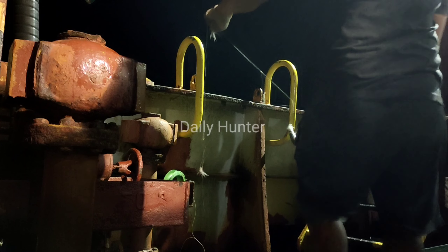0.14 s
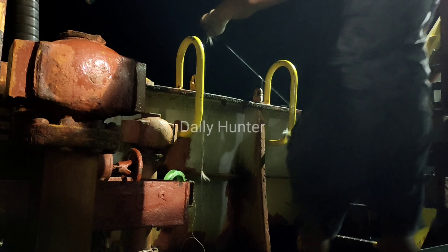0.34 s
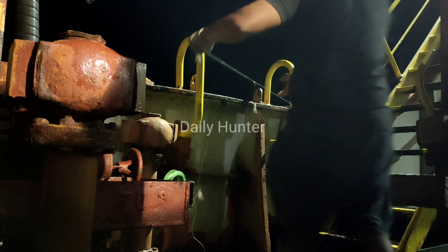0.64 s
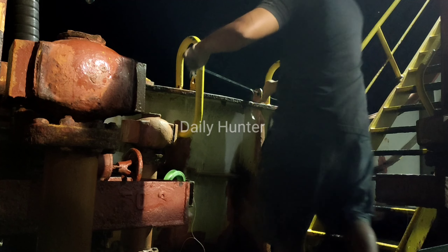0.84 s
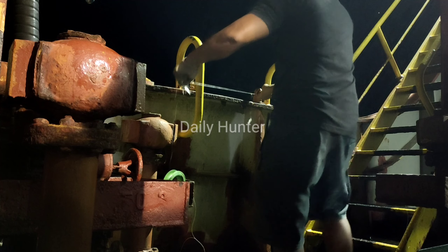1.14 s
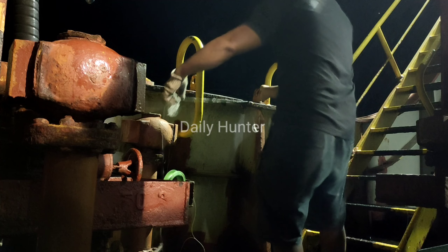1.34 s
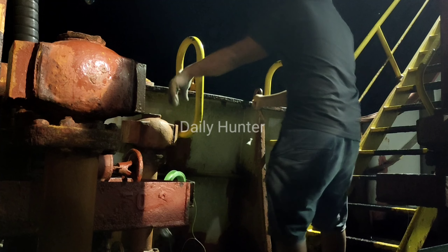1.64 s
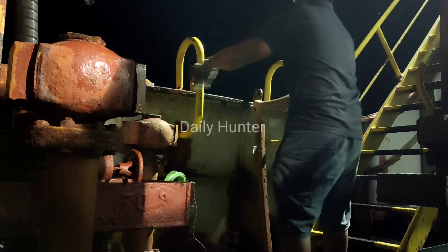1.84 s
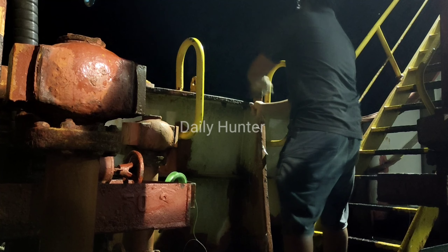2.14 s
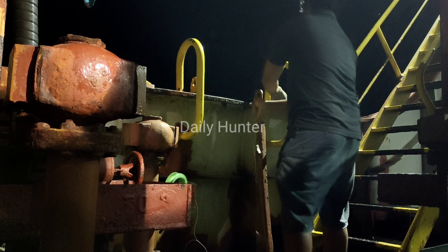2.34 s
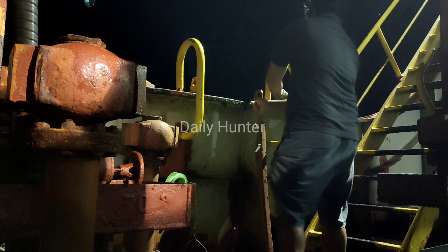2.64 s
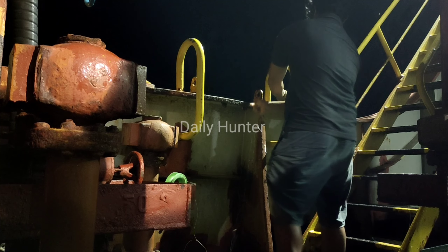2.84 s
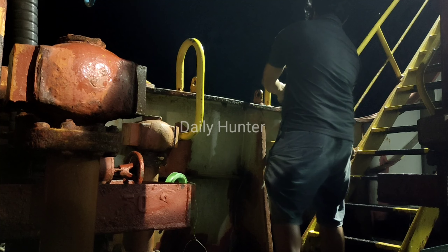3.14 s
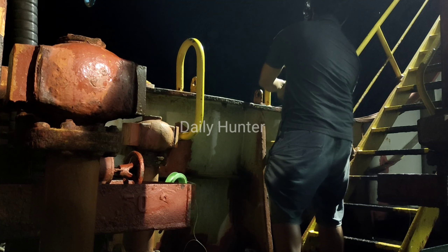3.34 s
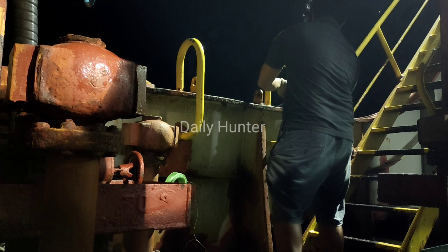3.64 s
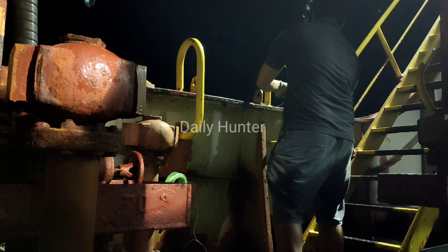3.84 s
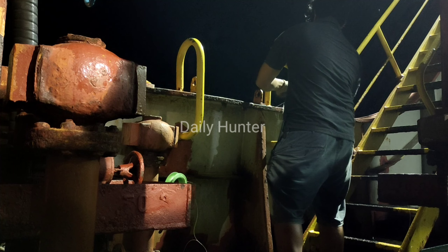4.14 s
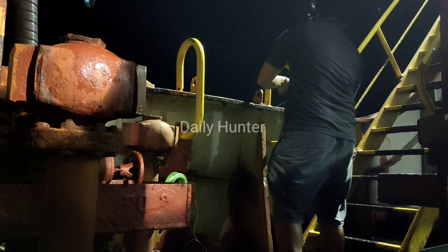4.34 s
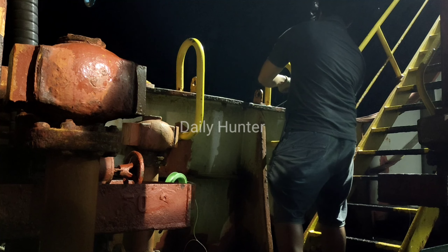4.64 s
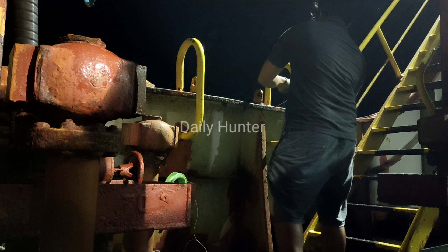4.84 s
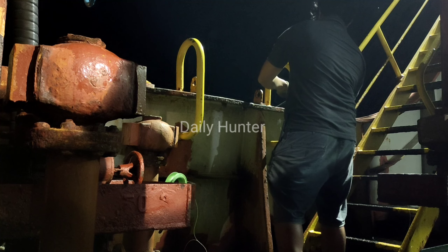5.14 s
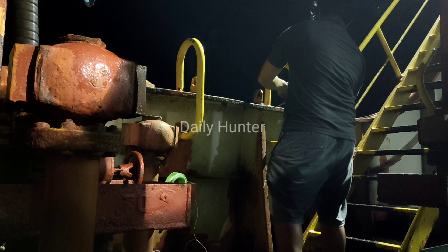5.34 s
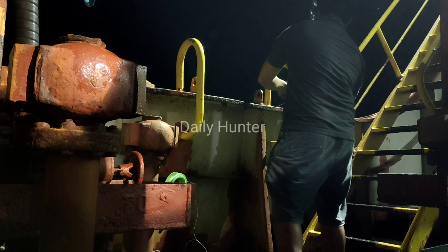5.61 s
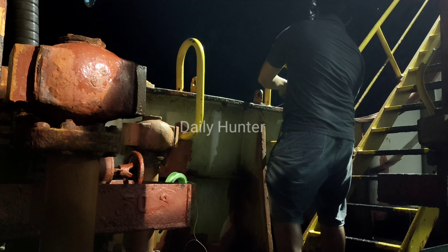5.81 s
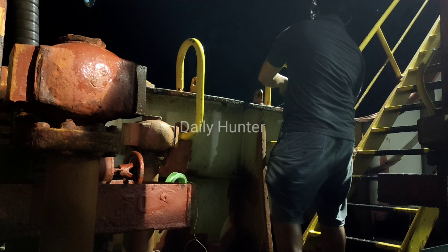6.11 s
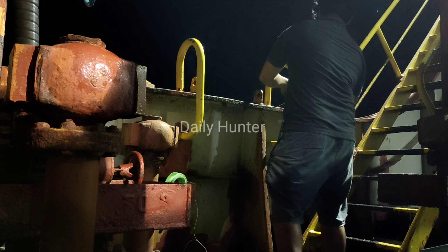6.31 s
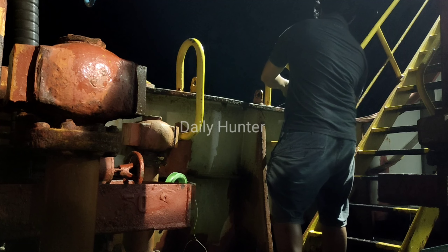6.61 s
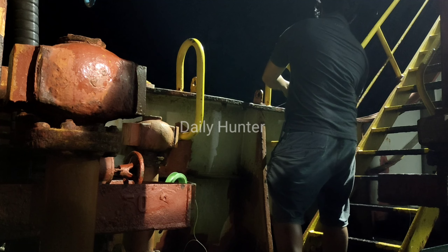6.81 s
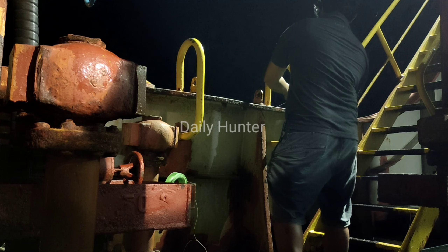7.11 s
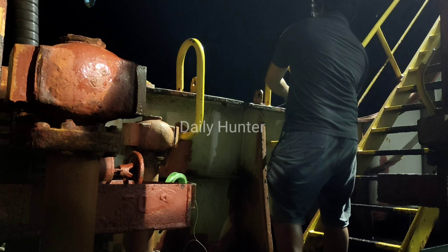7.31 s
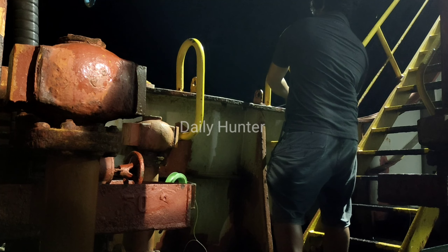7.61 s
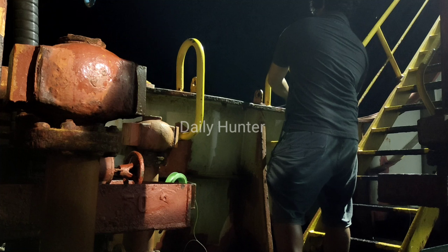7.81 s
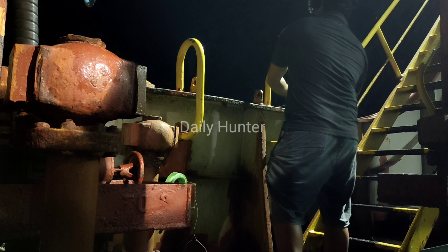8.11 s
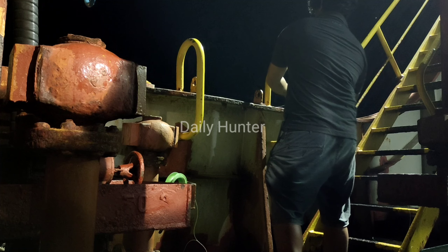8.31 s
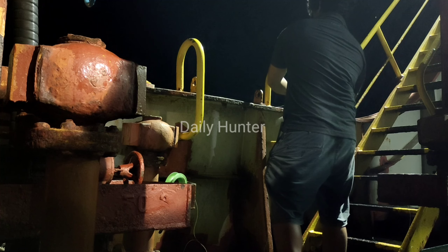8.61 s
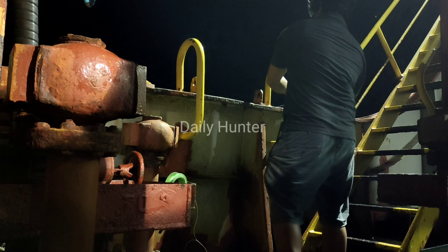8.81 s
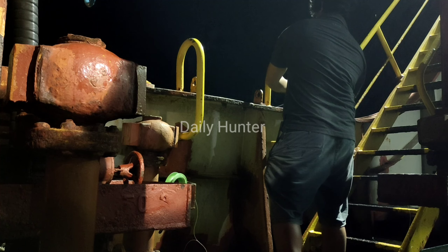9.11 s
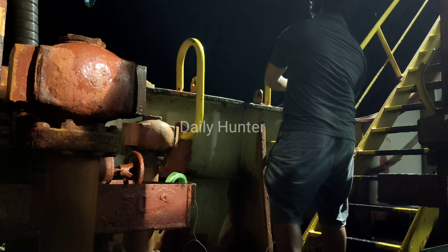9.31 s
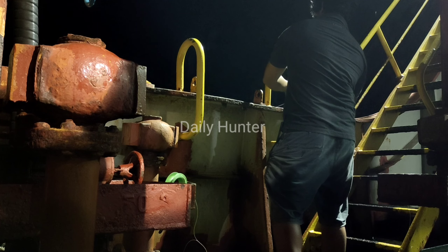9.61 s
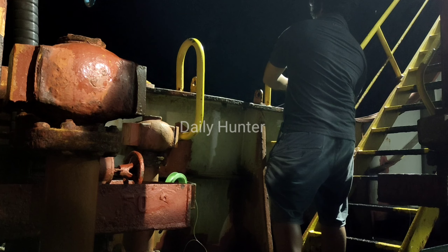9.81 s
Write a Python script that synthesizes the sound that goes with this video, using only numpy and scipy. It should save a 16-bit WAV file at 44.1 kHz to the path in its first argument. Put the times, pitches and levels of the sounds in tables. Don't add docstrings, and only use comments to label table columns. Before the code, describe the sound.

From 0 to 10 seconds a loud, low diesel drone runs without a break on a ship's steel deck. The strongest tone sits near 113 hertz, with neighbouring tones around 83 to 100 hertz making a rapid, rough throb; engine speeds stay steady, though the weaker set sags slightly around 4 seconds and strengthens afterwards. Above it, a vent duct hum near 187 hertz wavers, swelling and cutting off several times per second at irregular intervals, strongest in the first 2.5 seconds and again near 5.3 and 6.2. A muffled broad roar rings through plates with short metallic reflections. Very faint thin squeaks, around 1.6 kilohertz, come at about 6.1, 6.9, 7.2 and 7.9 seconds, nearly buried. Quiet microphone hiss stays on top, and the overall level rises only about a decibel and a half. It ends still droning.

```python
import sys
import numpy as np
from scipy import signal
from scipy.fft import rfft, irfft, next_fast_len
from scipy.io import wavfile

SR = 44100
rng = np.random.default_rng(int(sys.argv[2]) if len(sys.argv) > 2 else 0)


def pcm_store(signal):
    levels = np.round(np.clip(np.atleast_2d(signal), -1, 1) * 32767)
    wavfile.write(sys.argv[1], SR, levels.astype(np.int16).T)


def voltage_ratio(decibels):
    exponent = np.asarray(decibels, float) / 20
    return 10 ** exponent


N = 439236

BIG_SET_ORDERS = [(4, -53.5), (5, -52.0), (6, -38.5), (7, -21), (8, -25), (9, -12.5), (10, -58.5),
                  (11, -48.5), (18, -56.0), (20, -66), (21, -69), (23, -57), (24, -52.5), (25, -56.5),
                  (26, -58.5), (27, -61.5), (30, -62), (31, -67.5), (36, -64), (43, -69.5)]
SMALL_SET_ORDERS = [(5, -60), (6, -46.5), (7, -50), (8, -43.5), (9, -25.5), (10, -43.5), (13, -40.5),
                    (14, -40.5), (15, -48), (16, -53), (17, -56.5), (18, -54.5), (21, -53.5), (27, -57),
                    (29, -65), (32, -57.5), (33, -63), (35, -58.5), (36, -62.5)]
# time_s, firing_hz, crank_lead_rad (of firing), load_db
BIG_SET_RUN = [(0, 112.874, 1.4, 0), (10, 112.874, 1.4, 0)]
# time_s, firing_hz, crank_lead_rad (of firing), load_db
SMALL_SET_RUN = [(0, 82.86, -1.2, -.5), (1.75, 82.86, -1.5, -1.2), (3.2, 82.86, -1.6, .8),
                 (4.2, 82.86, -2.3, -2.5), (4.9, 82.86, -2.75, -1.5), (5.8, 82.86, -2.6, 1.2),
                 (8.6, 82.86, -2.9, 1), (10, 82.86, -2.95, 2.8)]
# peak_s, level_db_rms, build_up_s
DUCT_SWELLS = [(.33, -32.5, .28), (.55, -31.5, .14), (.8, -32, .16), (1.14, -37, .15), (1.36, -38.5, .12),
               (1.61, -33.5, .2), (1.97, -33.5, .6), (2.3, -31.5, .15), (2.44, -32.5, .2), (2.76, -40, .08),
               (3.33, -34, .4), (3.8, -35.5, .4), (4.33, -36.5, .3), (4.55, -35.5, .14), (4.88, -37.5, .3),
               (5.33, -31.5, .12), (5.77, -34, .2), (6.18, -31.5, .07), (6.57, -37, .15), (6.74, -32.5, .08),
               (7.57, -33.5, .9), (7.88, -35.5, .2), (8.07, -32, .13), (8.27, -33, .06), (8.57, -38, .05),
               (8.82, -38.5, .15), (9.04, -34.5, .3), (9.29, -34, .2), (9.82, -35.5, .4)]
# frequency_hz, density_db_per_hz
ROAR_SPECTRUM = [(20, -61.5), (45, -68.5), (95, -50), (135, -56.5), (250, -63.5), (600, -72), (800, -72.1),
                 (1400, -83.5), (2600, -88.5), (5700, -103.9), (8600, -101.6), (9700, -104.6),
                 (12000, -105.4), (15400, -105.5)]
# centre_hz, width_hz, peak_db
DECK_RESONANCES = [(103.6, 12, 5.5), (216, 11, 7.5), (270, 21, -3), (293, 32, 6.5), (342, 5, 4.5),
                   (384.5, 27, 8.5), (389, 13, -13.5), (402, 73, 4.5), (519, 12, 4), (616.5, 14, 9),
                   (653.5, 12, 8.5), (680.5, 18, 7.5), (700, 13, 3.5), (742, 13, 5.5), (810, 23, -2.5),
                   (829, 13, 6), (863, 24, 8.5), (904, 31, 7), (958, 25, 7), (1026.5, 24, 8.5),
                   (1070, 9.1, -3.5), (1152, 37, 5), (1233, 83, 4.5), (1282, 24, 5.5), (1554, 25, 3.5),
                   (1710, 37, 0.4), (1905, 140, 3.5), (2510, 300, 2.5), (2770, 118, 1.5)]
# delay_ms, signed_strength
DECK_ECHOES = [(3.29, -0.3), (4.9, -0.118), (6.93, 0.022), (10.94, -0.085), (13.17, -0.066), (16.72, 0.031),
               (23.6, 0.036), (32.27, -0.18), (36.01, -0.026)]
# start_s, length_s, pitch_hz, level_db_rms
JOINT_SQUEAKS = [
    (6.12, 0.39, 1580, -63),
    (6.9, 0.32, 1575, -62),
    (7.197, 0.12, 1576, -63),
    (7.85, .15, 1565, -67),
]
# time_s, gain_db
MIC_GAIN = [(0, -0.8), (.8, -1.0), (1.8, -0.27), (4, 0.5), (7, 0.62), (10, 0.73)]

FIRING_ORDER = 9


def in_time(rows):
    time_s, *columns = np.transpose(rows)
    return [np.interp(np.arange(N) / SR, time_s, column) for column in columns]


def drift(rate_hz):
    hop = 40
    pole = np.exp(-2 * np.pi * rate_hz * hop / SR)
    noise = rng.standard_normal(N // hop + 2002)
    slow = signal.lfilter([1], [1, -2 * pole, pole ** 2], noise)[2000:]
    return np.interp(np.arange(N) / hop, np.arange(len(slow)), slow / slow.std())


def cycle_angle(run):
    firing_hz, lead_rad, load_db = in_time(run)
    firing_rad = 2 * np.pi * firing_hz * np.arange(N) / SR + lead_rad
    return firing_rad / FIRING_ORDER, load_db


def engine(orders, run, unsteady_db):
    angle_rad, load_db = cycle_angle(run)
    stack_phase_rad = {0: 0, 1: np.pi, 2: np.pi, 3: 0}
    exhaust = np.zeros(N)
    for order, level_db in orders:
        below = FIRING_ORDER - order
        random_rad = rng.uniform(0, 2 * np.pi)
        phase_rad = stack_phase_rad.get(below, random_rad)
        waver_db = unsteady_db * min(abs(below), 3) * drift(0.95)
        exhaust += voltage_ratio(level_db + waver_db) * np.cos(order * angle_rad + phase_rad)
    return np.sqrt(2) * voltage_ratio(load_db) * exhaust


def duct(waver_hz):
    centre_hz, idle_db = 186.7, -47.0
    rise_db, fall_db_per_s = 11.5, 130
    t = np.arange(0, N / SR, 0.002)
    level_db = np.full(len(t), idle_db)
    for peak_s, peak_db, build_s in DUCT_SWELLS:
        before_db = rise_db * (peak_s - t) / max(build_s, 0.02)
        after_db = fall_db_per_s * (t - peak_s)
        loss_db = np.where(t < peak_s, before_db, after_db)
        level_db = np.maximum(level_db, peak_db - loss_db)
    pitch_hz = centre_hz + waver_hz * drift(9)
    envelope = voltage_ratio(in_time(np.transpose([t, level_db]))[0])
    return np.sqrt(2) * envelope * np.sin(2 * np.pi * np.cumsum(pitch_hz) / SR)


def reflections(hz, scatter_db, t60_s):
    near = sum(strength * np.exp(-2j * np.pi * hz * delay_ms / 1000)
               for delay_ms, strength in DECK_ECHOES)
    t = np.arange(SR // 4) / SR
    tail = rng.standard_normal(len(t)) * voltage_ratio(-60 * t / t60_s)
    scatter = rfft(tail / np.sqrt(np.sum(tail ** 2)), 2 * len(hz) - 2)
    dull = 1 / (1 + (hz / 1000) ** 2)
    return np.abs(1 + near * dull + voltage_ratio(scatter_db) * scatter * (1 - dull))


def roar_and_hiss(flutter):
    size = 2 * next_fast_len(N // 2 + 1)
    hz = np.arange(size // 2 + 1) * SR / size + 1e-3
    curve_hz, curve_db = np.transpose(ROAR_SPECTRUM)
    colour_db = np.interp(np.log(hz), np.log(curve_hz), curve_db)
    for centre_hz, width_hz, peak_db in DECK_RESONANCES:
        colour_db = colour_db + peak_db / (1 + (2 * (hz - centre_hz) / width_hz) ** 2)
    noise = rfft(rng.standard_normal(size)) * voltage_ratio(colour_db) * np.sqrt(SR / 2)

    hiss_share = 1 / (1 + (5000 / hz) ** 8)
    deck = reflections(hz, scatter_db=-18.5, t60_s=0.14)
    roar = irfft(noise * deck * (1 - hiss_share), size)[:N]
    hiss = irfft(noise * hiss_share, size)[:N]

    angle_rad, _ = cycle_angle(BIG_SET_RUN)
    beat = np.cos(2 * FIRING_ORDER * angle_rad)
    hiss_drift_db = 0.27 * drift(0.4) + 0.3 * drift(6)
    return roar + hiss * (1 + flutter * beat) * voltage_ratio(hiss_drift_db)


def squeaks():
    t = np.arange(N) / SR
    out = np.zeros(N)
    for start_s, length_s, pitch_hz, level_db in JOINT_SQUEAKS:
        stroke = np.sin(np.pi * np.clip((t - start_s) / length_s, 0, 1))
        wavering_hz = pitch_hz + 6 * drift(7.9)
        out += voltage_ratio(level_db) * stroke * np.sin(2 * np.pi * np.cumsum(wavering_hz) / SR)
    return np.sqrt(2) * out


def scene():
    big_set = engine(BIG_SET_ORDERS, BIG_SET_RUN, unsteady_db=0.2)
    small_set = engine(SMALL_SET_ORDERS, SMALL_SET_RUN, unsteady_db=0.53)
    mix = big_set + small_set + duct(waver_hz=3.5) + roar_and_hiss(flutter=0.04) + squeaks()
    return mix[None]


def low_pass(x):
    return signal.sosfilt(signal.butter(12, 16670, fs=SR, output="sos"), x)


def record(dry):
    gain_db = in_time(MIC_GAIN)[0]
    top_cut = signal.ellip(12, 0.2, 70, 15450, fs=SR, output="sos")
    mix = signal.sosfiltfilt(top_cut, dry * voltage_ratio(gain_db))
    return low_pass(mix)


dry = scene()
out = record(dry)
pcm_store(out)
```